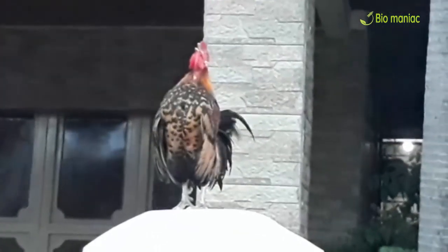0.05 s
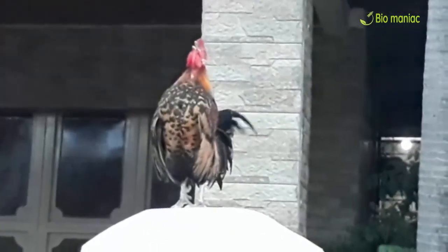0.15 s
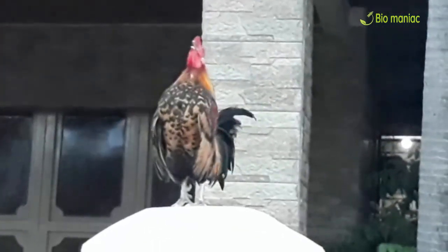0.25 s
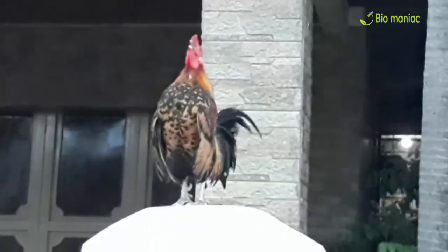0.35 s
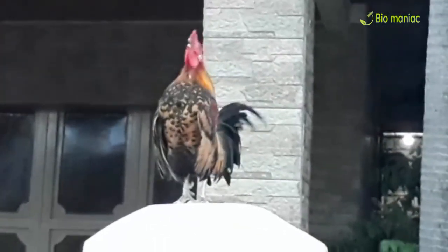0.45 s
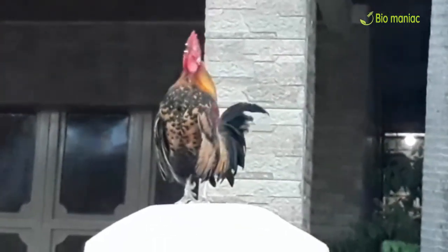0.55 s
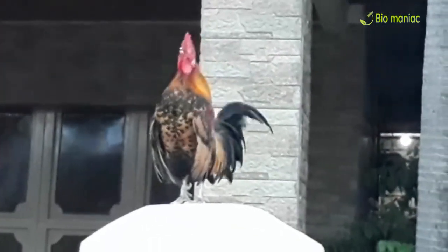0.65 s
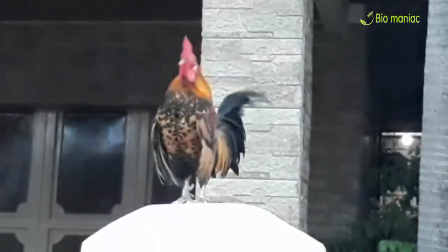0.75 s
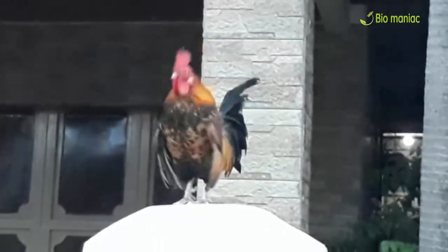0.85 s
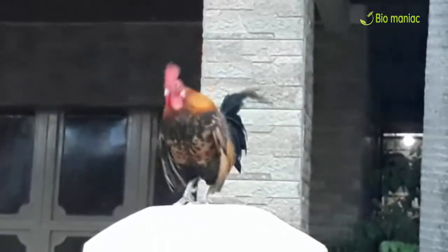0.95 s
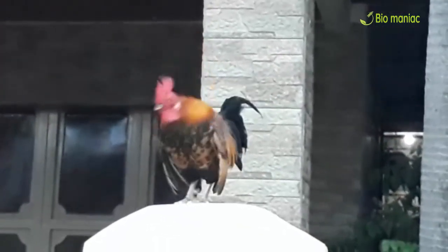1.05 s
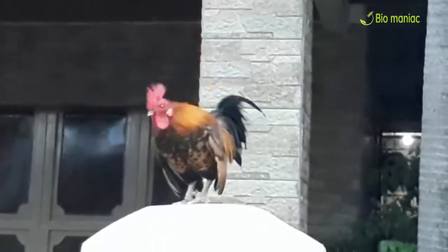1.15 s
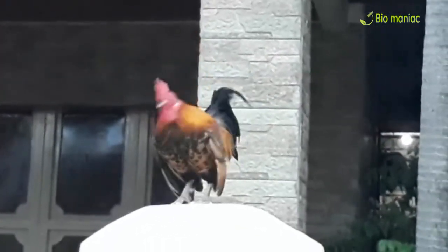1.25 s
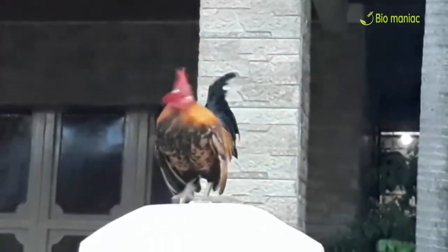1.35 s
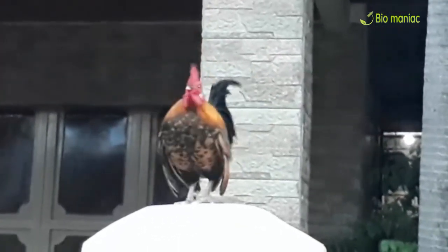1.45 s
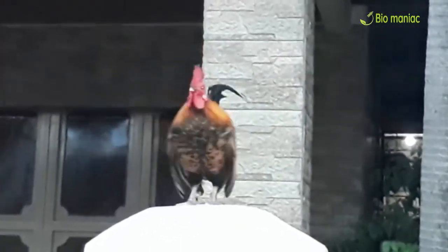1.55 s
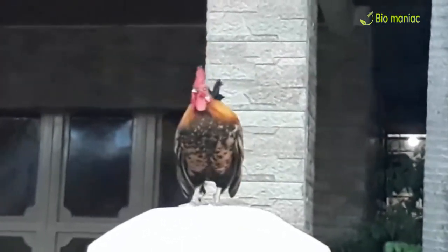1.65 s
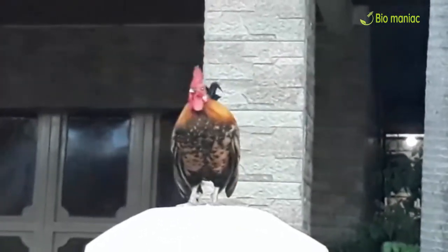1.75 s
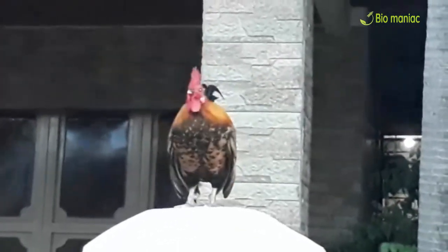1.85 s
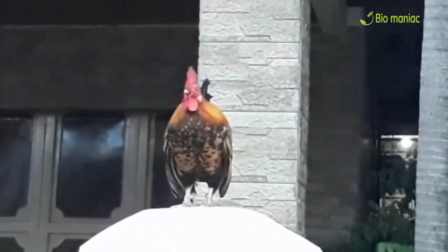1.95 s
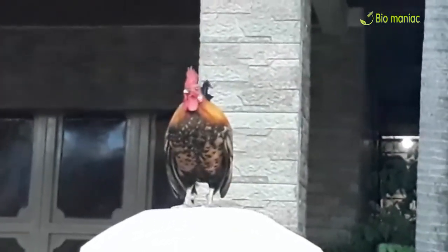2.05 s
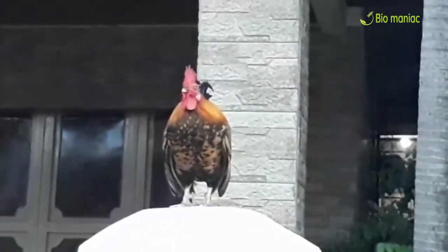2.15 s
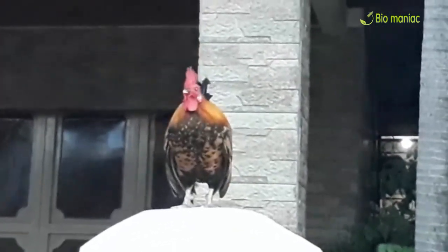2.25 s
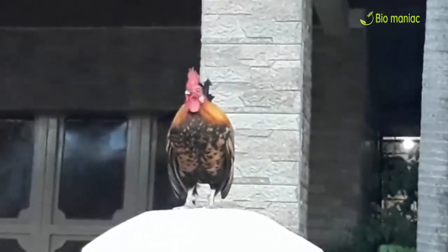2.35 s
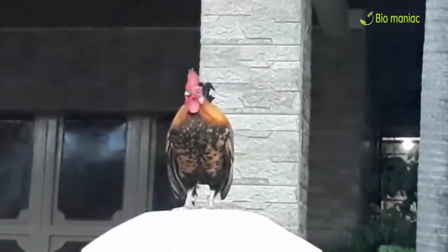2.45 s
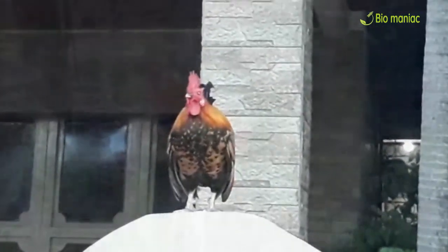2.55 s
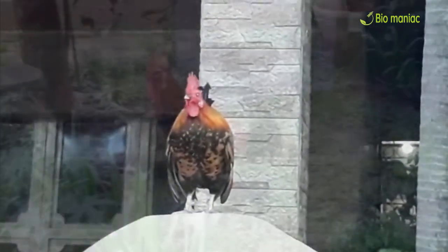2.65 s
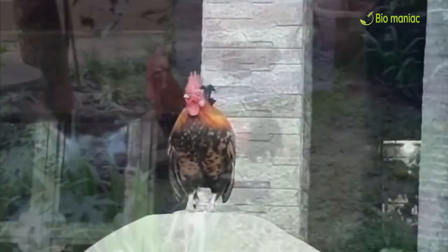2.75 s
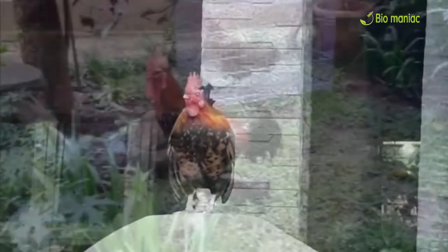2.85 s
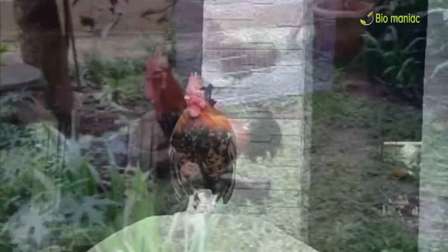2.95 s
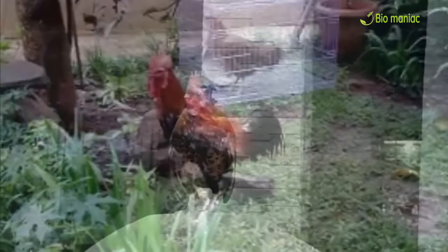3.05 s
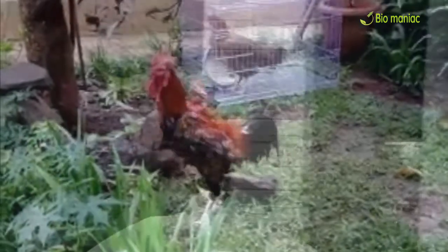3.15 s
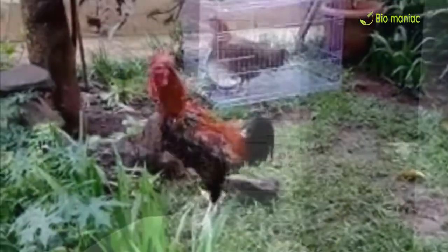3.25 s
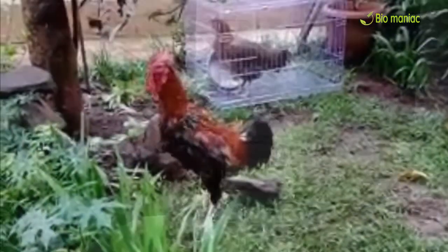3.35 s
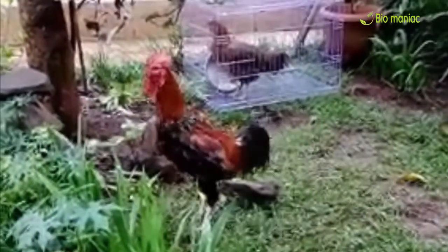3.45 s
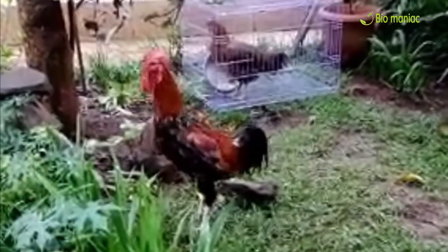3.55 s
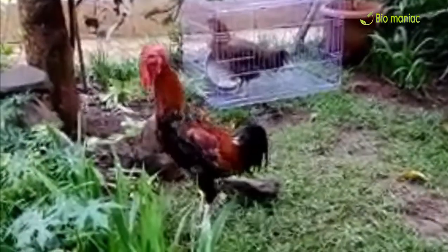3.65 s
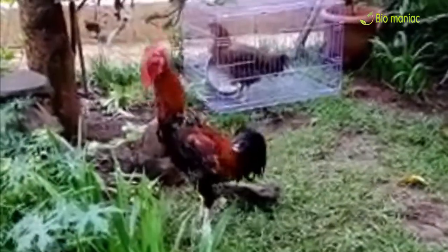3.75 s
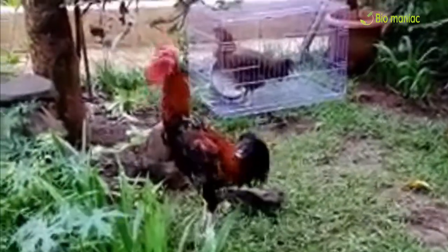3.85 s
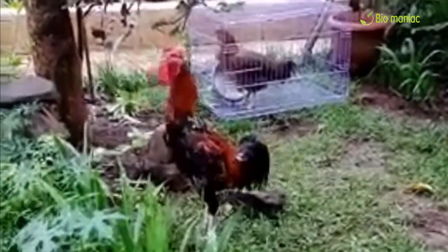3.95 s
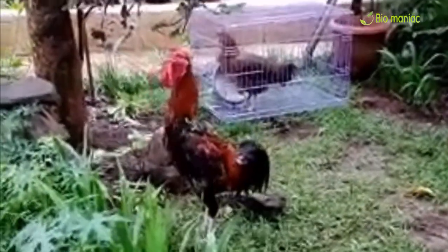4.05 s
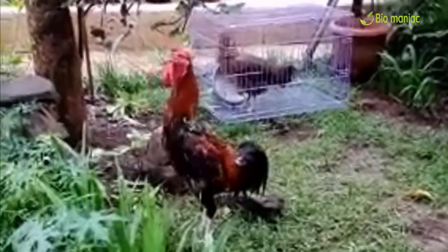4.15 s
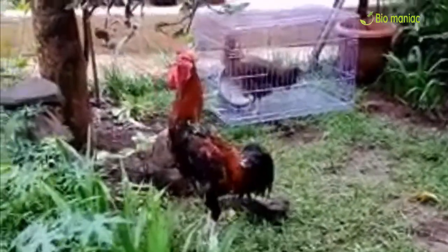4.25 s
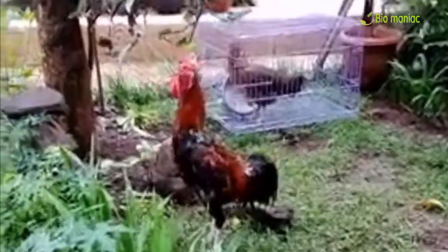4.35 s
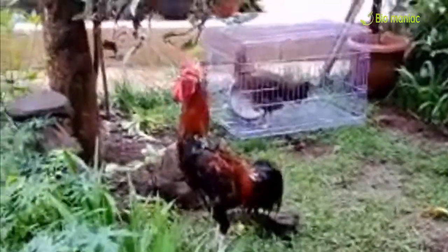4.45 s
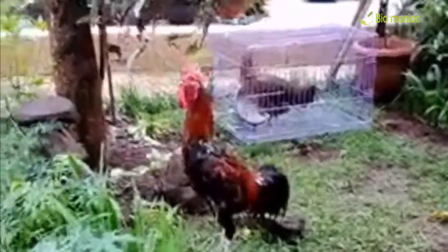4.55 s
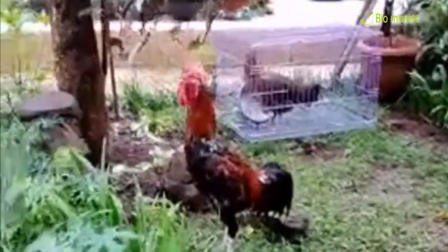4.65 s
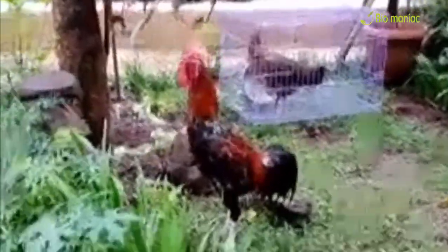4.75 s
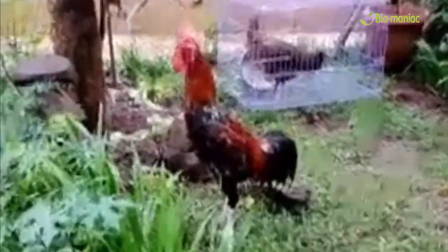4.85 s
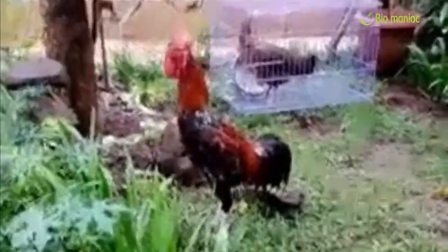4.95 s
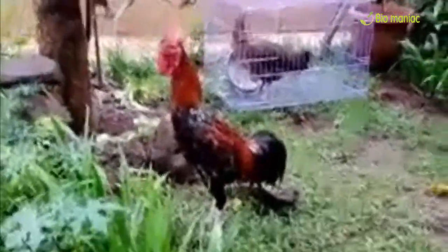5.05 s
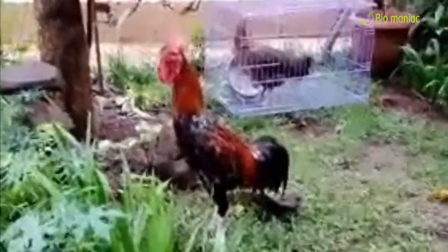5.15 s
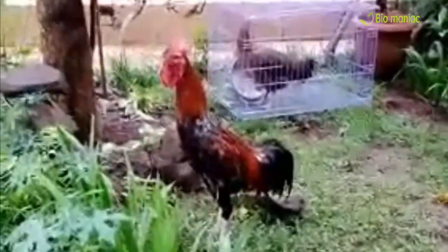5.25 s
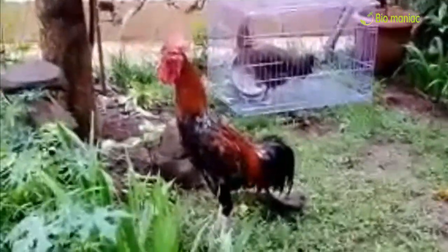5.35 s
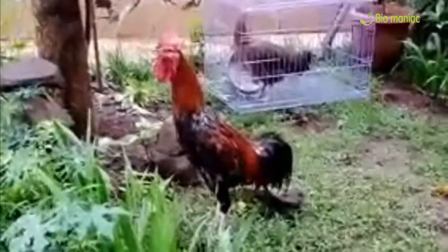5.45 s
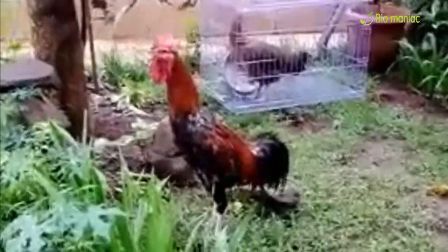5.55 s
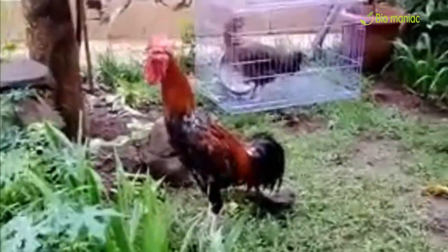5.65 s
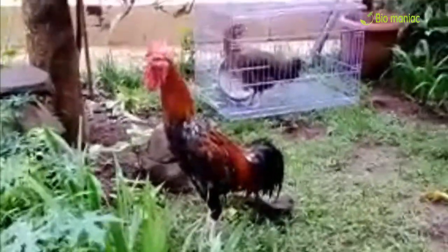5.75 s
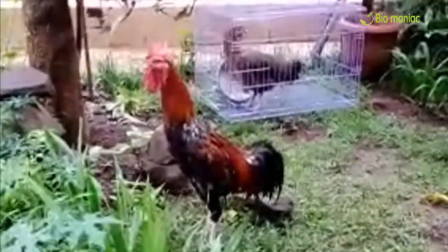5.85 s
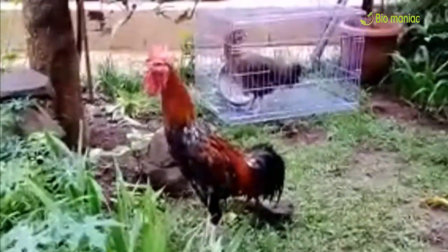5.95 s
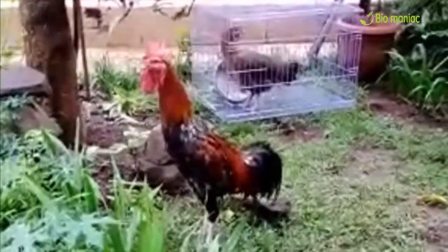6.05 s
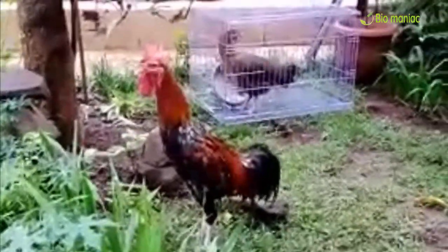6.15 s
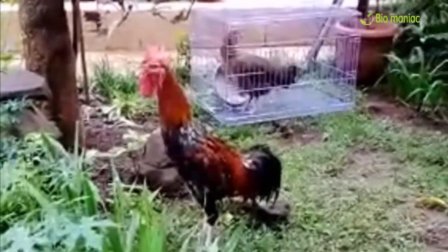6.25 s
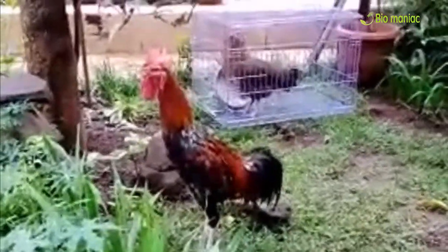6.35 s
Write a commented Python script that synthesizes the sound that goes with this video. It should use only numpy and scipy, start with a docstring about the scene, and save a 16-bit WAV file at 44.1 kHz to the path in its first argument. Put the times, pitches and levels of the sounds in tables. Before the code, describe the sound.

Raspy rooster crow with engine chug and faint chick peeps, a brief silence, then shrill squawks and a drawn-out, fluttering, dropping crow.

```python
"""Two roosters, porch and garden

A rooster on a porch rasps, crows and breaks off while an engine idles, growing louder, and a chick peeps.
After a short silence, in a garden: shrill squawks, then a long low crow that flutters, drops in pitch
and is drawn out over a slowly sinking rumble. Voices are harmonic series shaped by throat spectra,
the engine is a pulse train through damped modes, and air and rumble are filtered noise."""
import sys
import numpy as np
from scipy import signal
from scipy.fft import rfft, irfft, next_fast_len
from scipy.io import wavfile
from scipy.ndimage import map_coordinates

SR = 44100
rng = np.random.default_rng(int(sys.argv[2]) if len(sys.argv) > 2 else 0)


def wrap_up_sound(samples):
    """Save the sound to the file named by the first command line argument, as 16-bit audio."""
    columns = np.atleast_2d(samples).T
    # keep every value between -1 and 1, then stretch to whole-number steps
    tamed = np.clip(columns, -1, 1)
    steps = np.round(tamed * 32767).astype(np.int16)
    wavfile.write(sys.argv[1], SR, steps)


N = 282681
TIME = np.arange(N) / SR
TOP_HZ = 15750  # band limit of the voices and of the whole sound
TREMOR_HZ = 25.24  # both birds shake their voices at this rate
PORCH_END_S, GARDEN_START_S = 3.03, 3.345


# Held note of the porch crow: time_s, pitch_hz, level_db (before mixing)
CROW_NOTE = [(0.24, 999, -18), (0.286, 992, -19), (0.314, 1071, -20), (0.336, 1013, -17.5),
             (0.364, 1063, -14), (0.395, 1055, -18.5), (0.43, 1053, -17), (0.475, 1030, -18),
             (0.53, 1073, -18.5), (0.562, 1102, -12), (0.59, 1056, -10.5), (0.61, 1049, -14.5),
             (0.626, 1055, -8.5), (0.672, 1033, -13.5)]
# Spells in which that voice breaks up: start_s, end_s, added_roughness (0-1), added_doubling (0-1)
CROW_BREAKS = [(0, .27, 0.54, 0.62), (.405, .425, .34, 0.35), (.5, .64, .04, .06), (.7, .76, 0.38, 0.6)]
# Throat spectrum with the beak half open: frequency_hz, relative_level_db
HALF_OPEN_THROAT = [(600, -52), (850, -45.5), (1050, -2), (1400, -2), (1650, -18.5), (1950, 2.5),
                    (2300, -9), (2800, 1), (3250, -9), (3700, -5), (4700, -18), (5600, -8.5), (6800, -24),
                    (15000, -33.5)]
# Throat spectrum with the beak wide open: frequency_hz, relative_level_db
WIDE_OPEN_THROAT = [(620, -48), (800, 3), (1050, -2), (1550, 1), (2100, -5), (2600, 2), (3050, -17),
                    (3280, -17), (3650, -2), (4100, -22), (4750, -24), (5300, -3), (6200, -31),
                    (7400, -32.5), (8700, -19), (11500, -37), (13200, -32), (15000, -44)]
# Beak resonance, which rings out at the climax: time_s, centre_hz, added_gain (ratio, before flicker)
CROW_BEAK_RING = [(.6, 3150, 0), (.63, 3160, 1.8), (.66, 3110, 1.4), (.68, 3100, 2.6)]
# Spectrum of air through the open beak: frequency_hz, relative_level_db
BEAK_HISS = [(3000, -45), (6000, -3.5), (9000, -1.5), (15000, -3.5)]


def porch_rooster():
    """Source and filter: a shaking rasp clears as the beak opens, then the pitch collapses."""
    rasp_end_s, rasp_hz, rasp_db = .19, 940, -14.5
    shake_crest_s, shake_bend, shake_db = 0.0068, 0.023, 2  # bend as a share of the pitch
    fall_s, fall_hz_per_s = .675, 6300
    end_s, release_s = 0.708, 0.019
    pitch, db = curves([(rasp_end_s, rasp_hz, rasp_db)] + list(CROW_NOTE))
    beak = ramp(0.24, 0.22)  # 0 half open, 1 wide open
    shake = (1 - beak) * tremor(shake_crest_s)
    fall = fall_hz_per_s * np.clip(TIME - fall_s, 0, end_s + release_s - fall_s)
    pitch = pitch * (1 + shake_bend * shake) - fall
    db = db + shake_db * shake - 6.1 * ramp(fall_s, 0.06)
    envelope = amp(db) * gate(0, end_s, release=release_s)
    quality = voice_quality(CROW_BREAKS)
    narrow = syrinx(pitch, envelope, quality, HALF_OPEN_THROAT, jitter=.055, jitter_rate=250,
                    hiss=1.1, shimmer_db=2.2, count=16)
    wide = syrinx(pitch, envelope, quality, WIDE_OPEN_THROAT, jitter=.07, jitter_rate=800,
                  hiss=1.3, shimmer_db=2, count=16, ring=CROW_BEAK_RING)
    # sine and cosine crossfade from one throat shape to the other
    voice = amp(-1.0) * np.cos(beak * np.pi / 2) * narrow
    voice = voice + amp(-2.0) * np.sin(beak * np.pi / 2) * wide
    voice = voice + amp(-24.5) * beak * envelope * noise(BEAK_HISS)
    # a slap off the house front makes each gliding harmonic swell and dip
    slap = amp(-17.5) * np.interp(TIME - .0135, TIME, voice, left=0)
    return amp(-1.0) * (voice + slap) + amp(-5.5) * porch_room(voice)


# Fluttering note: time_s, pitch_hz (before tremor)
FLUTTER_PITCH = [(4.09, 484.2), (4.2, 477.5), (4.236, 496.9), (4.356, 520), (4.39, 503.2), (4.46, 515),
                 (4.57, 514), (4.64, 479.7), (4.69, 475.6)]
# Throat spectrum of the fluttering note: frequency_hz, relative_level_db
FLUTTER_FILTER = [(300, -49), (470, -9.5), (520, -5), (620, 10), (780, -6), (1020, -3.5), (1530, -4),
                  (1850, -25), (2500, -14), (3600, -15), (5250, -41), (5620, -21), (5900, -28), (6600, -32),
                  (7400, -19), (9200, -41.5), (11000, -35), (15000, -43.5)]
# Drawn-out note: time_s, pitch_hz (before the slide and wander)
DRAWL_PITCH = [(4.68, 371.8), (4.745, 355), (5.08, 363.7), (5.32, 362.3), (5.38, 347.4), (5.5, 348.6),
               (5.625, 345.5), (5.665, 354.1), (5.84, 359), (6.14, 366.4), (6.41, 373.1)]
# Spells in which the drawl breaks up: start_s, end_s, added_roughness (0-1), added_doubling (0-1)
DRAWL_BREAKS = [(4.68, 4.72, .06, 0), (4.8, 5, 0.04, 0.08), (5.04, 5.31, 0.07, 0.4), (5.33, 5.37, .1, 0.15),
                (5.69, 6.12, 0.03, 0.09)]
# Throat spectrum of the drawl: frequency_hz, relative_level_db
DRAWL_FILTER = [(360, -26), (540, 9.5), (720, -2), (1080, 1), (1260, -13.5), (1440, -1), (1630, 2.5),
                (1850, -26.5), (2050, -16), (2200, -4), (2600, -35), (2850, -22.5), (3150, -18.5),
                (3700, -25.5), (4400, -34), (5300, -35.5), (7400, -32), (15000, -57)]
# Beak resonance of the drawl: time_s, centre_hz, added_gain (ratio, before flicker)
DRAWL_BEAK_RING = [(4.7, 2260, 2.3), (4.735, 2190, 2), (4.79, 2900, 5.4), (5.05, 3123, 8.6),
                   (5.4, 3050, 4.7), (5.55, 3160, 3.4), (5.68, 3170, 5.2), (5.95, 3200, 5.3),
                   (6.05, 3200, 2.2), (6.4, 3210, 1.5)]


def garden_rooster():
    """Source and filter: grunts, a tremulous note and a lower drawl; returns the voice and its envelope."""
    start, drop = FLUTTER_PITCH[0][0], DRAWL_PITCH[0][0]
    release_s = 0.043
    high = amp(-21.5) * gate(start, drop - release_s / 2, release=release_s)
    shake = ramp(4.36, 0.083) * tremor(4.498)
    shake = shake * (1 + .25 * wobble(13))  # uneven swings
    pitch = curves(FLUTTER_PITCH)[0] * (1 + .014 * shake)
    flutter = syrinx(pitch, high, (.36, .06), FLUTTER_FILTER, jitter=.05, jitter_rate=600,
                     hiss=1.2, shimmer_db=3.5, count=30)
    # the swing of level acts mainly on the lower harmonics
    lower = filtered(flutter, lambda f: 1 / (1 + (f / 5400) ** 4))
    flutter = flutter + .42 * shake * lower

    age = np.maximum(TIME - drop, 0)
    level_db, sag_db_per_s, waver_db = -23.5, 1.3, 2.25
    db = level_db - sag_db_per_s * age + waver_db * wobble(12)
    low = amp(db) * gate(drop, TIME[-1])
    # the pitch slides down into the drawl, then wanders
    slide = 0.086 * np.exp(-age / 0.024)
    pitch = curves(DRAWL_PITCH)[0] * (1 + slide + 0.0018 * wobble(14))
    drawl = syrinx(pitch, low, voice_quality(DRAWL_BREAKS), DRAWL_FILTER, jitter=0.085, jitter_rate=200,
                   hiss=0.31, shimmer_db=6.5, count=42, ring=DRAWL_BEAK_RING)
    return grunts() + flutter + drawl, high + low


# Hoarse grunts that open the garden crow: full_level_s, level_db (before flicker)
GRUNT_TIMES = [(3.806, -25), (4.026, -30)]
# Throat spectrum of the grunts: frequency_hz, relative_level_db
GRUNT_FILTER = [(180, -52), (300, -17.5), (463, -6), (742, 4.5), (809, -10.5), (1260, -5.5), (1720, -18),
                (1930, -9), (2520, -11), (3000, -7), (3900, -36.5), (6600, -120)]


def grunts():
    """Turbulent noise through a throat, with quick attacks and exponential decays."""
    attack_s, hold_s, decay_db_per_s = 0.015, 0.036, 85
    envelope = 0
    for s, db in GRUNT_TIMES:
        decay_db = decay_db_per_s * np.maximum(TIME - s - hold_s, 0)
        envelope = envelope + ramp(s - attack_s, attack_s) * amp(db - decay_db)
    return envelope * noise(GRUNT_FILTER) * amp(0.43 * wobble(150))


# Squawks: start_s, length_s, start_pitch_hz, end_pitch_hz, level_db, roughness (0-1), doubling (0-1)
SQUAWK_GLIDES = [(3.348, 0.07, 2960, 2970, -33.5, 0.3, 0.3), (3.428, 0.044, 2900, 2690, -23.5, 0.4, .05),
                 (3.468, 0.039, 3634, 3606, -23, 1, .7), (3.525, .055, 4270, 4240, -26, 0.35, 1),
                 (3.604, 0.0091, 2915, 3960, -26.5, 0.4, .1), (3.622, .016, 3983, 3477, -18.5, 0.6, .1),
                 (3.646, 0.03, 3180, 3020, -25, .6, .1), (3.803, 0.016, 5600, 5055, -19, .8, .4),
                 (3.826, 0.025, 4300, 3850, -18, 0.5, 0.2), (3.859, 0.0055, 3880, 4670, -11, 0.8, .2),
                 (3.871, 0.016, 3487, 4130, -13, 0.7, 0.3), (3.893, 0.011, 4350, 4140, -13.5, .45, .1),
                 (3.975, 0.012, 3496, 3230, -19.5, 0.5, .3), (3.993, .022, 3600, 3848, -15, 0.45, .05),
                 (4.027, .015, 3828, 4620, -14.5, .6, .05)]
# Throat spectrum of the squawks: frequency_hz, relative_level_db
SQUAWK_FILTER = [(1200, -20), (2100, -33.5), (2800, -18.5), (3500, -10), (4300, -5.5), (5600, -7.5),
                 (6700, -12), (7900, -13.5), (9500, -34), (11500, -29.5), (15500, -36)]


def squawks():
    """Irregular vibration at very high pitch: torn screeches, each one short glide."""
    out = np.zeros(N)
    for s, length, start_hz, end_hz, db, rough, doubling in SQUAWK_GLIDES:
        pitch = start_hz + (end_hz - start_hz) * ramp(s, length)
        envelope = amp(db) * gate(s, s + length, attack=0.005, release=0.008)
        out += syrinx(pitch, envelope, (rough, doubling), SQUAWK_FILTER, jitter=.11, jitter_rate=900,
                      hiss=.5, shimmer_db=4.5, count=5)
    return out


def syrinx(pitch, envelope, quality, throat, jitter, jitter_rate, hiss, shimmer_db, count, ring=((0, 0, 0),)):
    """Membrane pulses through a throat; roughness shakes pitch and level and adds air once a cycle."""
    on = envelope > 0
    time, out = TIME[on], np.zeros(N)
    rough, doubling = ((np.clip(q, 0, 1) * np.ones(N))[on] for q in quality)
    beak_hz, beak_gain = (c[on] for c in curves(ring))
    beak_gain = np.abs(beak_gain) * amp(4 * wobble(70, time))  # the beak resonance flickers too
    pitch = pitch[on]
    shaken_pitch = pitch * (1 + jitter * rough * wobble(jitter_rate, time))
    phase = 2 * np.pi * np.cumsum(shaken_pitch) / SR
    tone, power = 0, 1e-12
    for k in range(1, 2 * count + 1):
        # alternating strong and weak pulses put lines halfway between the harmonics
        hz = pitch * k / 2
        gain = amp(along(throat, hz)) * (hz < TOP_HZ) * (doubling if k % 2 else 1)
        power = power + gain ** 2 / 2
        gain = gain * (1 + beak_gain / (1 + ((hz - beak_hz) / 110) ** 2))
        flicker = amp(2 * np.minimum(hz / 2000, 1.5) * wobble(45, time))
        # a random fixed phase for each harmonic makes the pulses less peaky
        offset = rng.uniform(0, 2 * np.pi)
        tone = tone + gain * flicker * np.cos(k / 2 * phase + offset)
    puffs = rfft(rng.standard_normal(N)[on] * (1 + np.cos(phase)))
    throat_gain = amp(along(throat, np.fft.rfftfreq(len(time), 1 / SR)))
    air = unit(irfft(puffs * throat_gain, len(time)))
    voice = (tone / np.sqrt(power) + hiss * rough * air) / np.sqrt(1 + (hiss * rough) ** 2)
    out[on] = voice * envelope[on] * amp(shimmer_db * rough * wobble(jitter_rate / 2, time))
    return out


def tremor(crest):
    """Sinusoidal modulation: the shake of a crowing voice, from -1 to 1."""
    return np.cos(2 * np.pi * TREMOR_HZ * (TIME - crest))


def voice_quality(spells):
    """Irregular vibration: roughness and period doubling of a clear voice that breaks up in spells."""
    rough, doubling = .07, 0.023  # the clear voice
    break_s = 0.04  # time to break or recover
    for start, end, more_rough, more_doubling in spells:
        broken = gate(start, end, break_s, break_s)
        rough = rough + more_rough * broken
        doubling = doubling + more_doubling * broken
    return rough, doubling


# Damped modes of the exhaust: centre_hz, width_hz, relative_level_db
EXHAUST_MODES = [(120, 34, -2), (127, 19.4, 5), (154.6, 7.2, 4), (220.2, 20, -3.5), (287, 160, -10.5),
                 (374, 18.4, -1.5), (503, 33, -23.5)]
# Spectrum of the gas puffs: frequency_hz, relative_level_db
GAS_PUFF = [(29, -77), (50, -52), (74, -4.5), (146, -11.5), (194, -3.5), (232, 0), (365, -0.5), (417, -29),
            (465, -4), (555, -23.5), (700, -41), (910, -75), (1540, -120)]


def engine():
    """Impulse excitation: each firing rings the exhaust modes and lets out a puff of gas."""
    firings_per_s, firing_s = 22.87, 2.028  # rate, and the moment of one firing
    turns = firings_per_s * (TIME - firing_s)
    firings = np.diff(np.floor(turns), prepend=np.floor(turns[0])) * amp(3.1 * wobble(22.93))

    def exhaust(f):
        """Modal sum: pipe modes of alternating sign, within the band the muffler passes."""
        pipe = sum((-1) ** k * amp(g) * resonance(f, c, w) for k, (c, w, g) in enumerate(EXHAUST_MODES))
        return pipe / (1 + (f / 520) ** 8) * (1 - 1 / (1 + (f / 85) ** 8))

    beat = unit(filtered(firings, exhaust))
    gas = rng.standard_normal(N) * (1.5 + np.exp(-(turns % 1) / 0.86))
    puff = unit(filtered(gas, lambda f: amp(along(GAS_PUFF, f))))
    level_db = -40 + 4 * TIME  # steadily louder
    return amp(level_db) * (amp(-1.5) * beat + amp(-5) * puff)


# Peeps: start_s, length_s, middle_pitch_hz, level_db, downward_glide (share of the pitch)
CHICK_PEEPS = [(1.45, 0.081, 3234, -43.5, 0.02), (1.63, 0.07, 4870, -51, 0.045),
               (2.14, 0.066, 3280, -55, 0.0057), (2.375, 0.076, 3230, -41, 0.034)]


def chick():
    """Frequency modulation: thin pure tones that arch up and down in pitch as they glide downward."""
    out = np.zeros(N)
    for s, length, hz, db, glide in CHICK_PEEPS:
        progress = ramp(s, length)
        arch = np.sin(np.pi * progress).clip(0)
        pitch = hz * (1 - .06 * (1 - arch) ** 2 - glide * (progress - .5))
        out += amp(db) * arch ** .5 * np.sin(2 * np.pi * np.cumsum(pitch) / SR)
    return out + amp(-8) * porch_room(out)


def squeal():
    """Frequency jitter: a thin, hoarse tone and its octave from a bird farther off, sagging as they fade."""
    start_s = 1.168
    age = np.clip(TIME - start_s, 0, 1)
    pitch = (5650 - 1200 * age) * (1 + .06 * wobble(1500))
    phase = 2 * np.pi * np.cumsum(pitch) / SR
    envelope = ramp(start_s, .02) * amp(-45.5 - 55 * age + 4.6 * wobble(130))
    return envelope * (np.sin(phase) + amp(-13) * np.sin(2 * phase))


# Faint ticks and breathy noises, one perhaps a distant bird's call:
# start_s, level_db, rise_s, t60_s, centre_hz, width_hz
FAINT_NOISES = [(.94, -48.5, 0.022, 0.54, 4457, 3070), (1.092, -38, 0.00051, 0.02, 1604, 1790),
                (1.12, -42, 0.07, 0.85, 4060, 1100), (1.613, -41.5, 0.00054, 0.016, 4040, 8040),
                (1.961, -51, .001, .04, 6000, 8000), (2.165, -50.5, .001, 0.081, 5991, 8000),
                (2.695, -44, 0.00209, 0.1, 4000, 5980), (2.72, -40, 0.0025, 0.66, 3500, 5820)]
# Dull knock: start_s, level_db (before the low-pass), frequency_hz, t60_s
KNOCK = [(0.2722, -3.5, 175, 0.0081)]


def small_sounds():
    """Exponential decay: resonant noise for ticks and breathy noises, a damped cosine for one dull knock."""
    out = np.zeros(N)
    for s, db, rise, t60, hz, width in FAINT_NOISES:
        age = np.maximum(TIME - s, 0)
        grain = unit(filtered(rng.standard_normal(N), lambda f: resonance(f, hz, width)))
        decay = np.exp(-np.log(1000) * np.maximum(age - rise, 0) / t60)
        out += grain * np.minimum(age / rise, 1) * amp(db) * decay
    for s, db, hz, t60 in KNOCK:
        age = np.maximum(TIME - s, 0)
        decay = np.exp(-np.log(1000) * age / t60)
        push = amp(db) * decay * np.cos(2 * np.pi * hz * age) * (age > 0)
        out += filtered(push, lambda f: 1 / (1 + (f / 800) ** 4))
    return out


# Reverberation on the porch: frequency_hz, t60_s
PORCH_DECAY = [(200, 0.12), (1000, 0.62), (5000, 0.63), (12000, 0.42)]


def porch_room(x):
    """Diffuse reverberation of the porch surroundings."""
    return reverb(x, PORCH_DECAY)


# Spectrum of the porch air: frequency_hz, relative_level_db
PORCH_BACKGROUND = [(240, -36), (400, -13), (643, -16.5), (1200, -16), (1470, -23.5), (2250, -20.5),
                    (3010, -29), (4030, -31), (4220, -29.5), (13900, -45.5), (15500, -43.5)]


def porch():
    """Superposition: everything by the house, the same in both ears, over air noise and a faint whine."""
    air = amp(-45) * noise(PORCH_BACKGROUND)
    whine = amp(-61) * np.sin(2 * np.pi * 3950 * TIME + .6 * wobble(30))
    return porch_rooster() + engine() + chick() + squeal() + small_sounds() + air + whine


# Interaural cues of the garden voices: time_s, left_minus_right_db, left_lag_samples
VOICE_BEARING = [(3.7, 5.2, 3.65), (4.05, 4, 3.65), (4.25, .5, 4.5), (4.75, .2, 9), (5.7, 3, 9.3)]
# Reverberation in the garden: frequency_hz, t60_s
GARDEN_DECAY = [(300, 0.47), (1000, 1), (4000, 0.77), (12000, 0.088)]
# Spectrum of the garden rumble: frequency_hz, relative_level_db
GARDEN_RUMBLE = [(20, -2), (60, 2.5), (105, -0.5), (160, -6.5), (300, -14), (700, -25.5), (2000, -25),
                 (2600, -30), (3300, -15), (5200, -37), (7500, -29.5), (9500, -27), (15000, -32.5)]


def garden():
    """Interaural differences place the voices; walls answer diffusely over partly correlated rumble."""
    shrill = squawks()
    crow, effort = garden_rooster()
    # air through the beak follows the effort of the crow
    hiss = unit(filtered(rng.standard_normal(N), lambda f: resonance(f, 7320, 480)))
    hiss = amp(-27.5) * effort * hiss
    rumble = noise(GARDEN_RUMBLE)
    swell_db = 11.5 * np.exp(-((TIME - 3.85) / 0.03) ** 2)  # the rumble swells briefly
    rumble_db = -41 - 1.53 * (TIME - GARDEN_START_S) + swell_db
    # a low drone rises out of the rumble
    hum = unit(filtered(rng.standard_normal(N), lambda f: resonance(f, 100.5, 12) ** 2))
    hum = amp(-44.5) * gate(5.6, 6.15, 0.081, 0.23) * hum
    pan_db, lag = curves(VOICE_BEARING)
    ears = []
    for side in (1, -1):  # left, right
        direct = map_coordinates(shrill + crow, [np.arange(N) - side * lag / 2]) + hiss
        walls = reverb(amp(-9) * shrill + amp(-12) * crow, GARDEN_DECAY)
        air = amp(rumble_db) * (rumble + 0.37 * noise(GARDEN_RUMBLE))
        ears.append(amp(side * pan_db / 2) * (direct + walls) + air + hum)
    fade_in_db = 22 * (ramp(GARDEN_START_S, 0.16) - 1)
    return np.array(ears) * amp(fade_in_db)


def reverb(x, t60s):
    """Diffuse reverberation: convolution with noise in which each frequency dies at its own speed."""
    hz, t, z = signal.stft(rng.standard_normal(SR * 3 // 4), SR, nperseg=256)
    decay = amp(-60 * t / along(t60s, hz)[:, None])
    tail = signal.istft(z * decay, SR, nperseg=256)[1]
    tail = np.pad(tail, (SR // 200, 0))  # 5 ms before the first answer
    return signal.fftconvolve(x, tail / np.linalg.norm(tail))[:N]


def resonance(f, centre, width):
    """Damped oscillator: causal response of one mode."""
    return 1j * f * width / (centre ** 2 - f ** 2 + 1j * f * width)


def noise(spectrum):
    """Spectral shaping: coloured noise of rms 1."""
    return unit(filtered(rng.standard_normal(N), lambda hz: amp(along(spectrum, hz))))


def filtered(x, response):
    """Linear filtering: the spectrum of x times a response of frequency."""
    m = next_fast_len(N + SR // 4)
    return irfft(rfft(x, m) * response(np.fft.rfftfreq(m, 1 / SR)), m)[..., :N]


def wobble(rate, time=TIME):
    """Band-limited fluctuation: a smooth random curve, rate knots a second."""
    return map_coordinates(rng.standard_normal(int(N * rate / SR) + 4), [time * rate])


def ramp(start, length):
    """Linear onset from zero to one, beginning at start."""
    return np.clip((TIME - start) / length, 0, 1)


def gate(start, end, attack=0.0077, release=0.0056):
    """Trapezoidal envelope: one between two times, with an attack before and a release after."""
    return ramp(start - attack, attack) * (1 - ramp(end, release))


def curves(rows):
    """Linear interpolation: one value per sample for each column after the time."""
    s, *cols = np.transpose(rows)
    return [np.interp(TIME, s, c) for c in cols]


def along(points, hz):
    """Logarithmic frequency scale: interpolates (Hz, value) points."""
    f, v = np.transpose(points)
    return np.interp(np.log(hz + 1), np.log(f + 1), v)


def amp(db):
    """Decibel law: amplitude ratio of a level."""
    return 10 ** (np.asarray(db) / 20)


def unit(x):
    """Power normalisation: scales x to rms 1."""
    return x / np.sqrt(np.mean(x ** 2) + 1e-20)


def scene():
    """Succession in time: the porch, a moment of silence, the garden."""
    return porch() * gate(0, PORCH_END_S) + garden() * gate(GARDEN_START_S, TIME[-1])


def record(dry):
    """Saturation and band limiting: loud peaks are rounded off; nothing is kept above the band limit."""
    overload = .75  # amplitude that the rounded peaks approach
    rounded = dry / (1 + np.abs(dry / overload) ** 6) ** (1 / 6)
    return filtered(rounded, lambda hz: hz < TOP_HZ)


dry = scene()
out = record(dry)
wrap_up_sound(out)
```